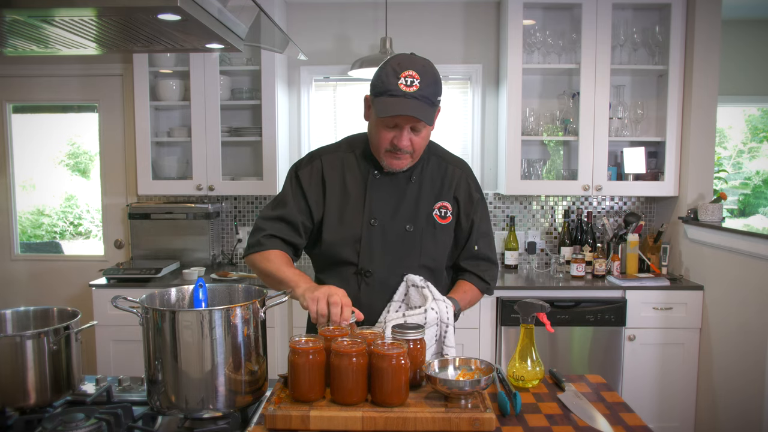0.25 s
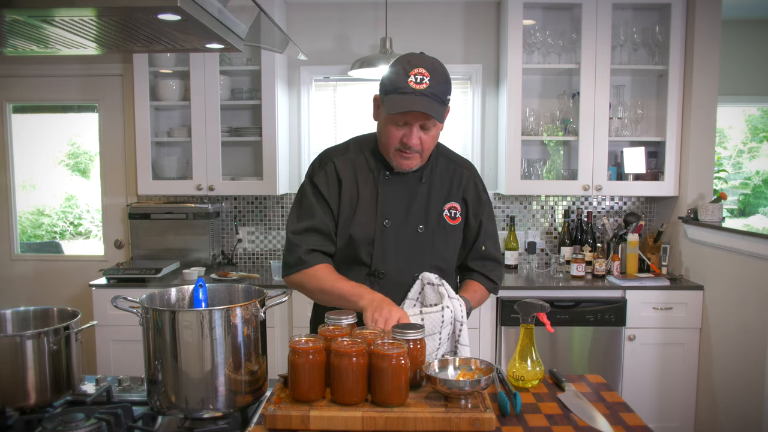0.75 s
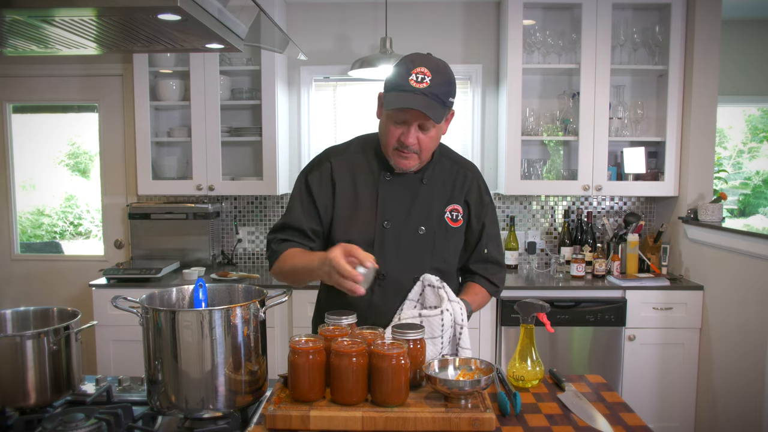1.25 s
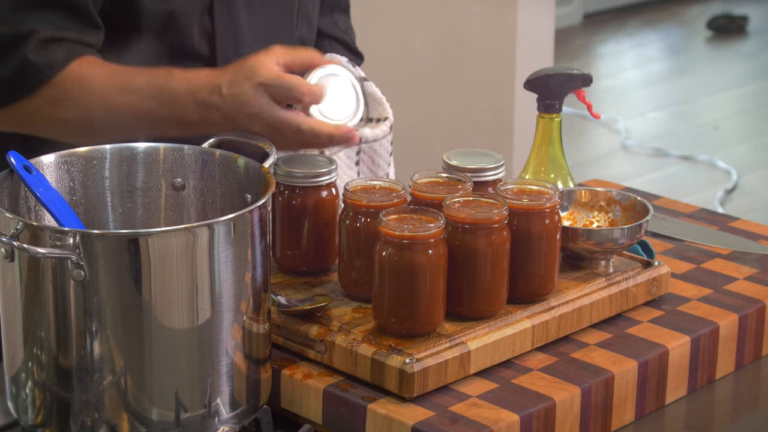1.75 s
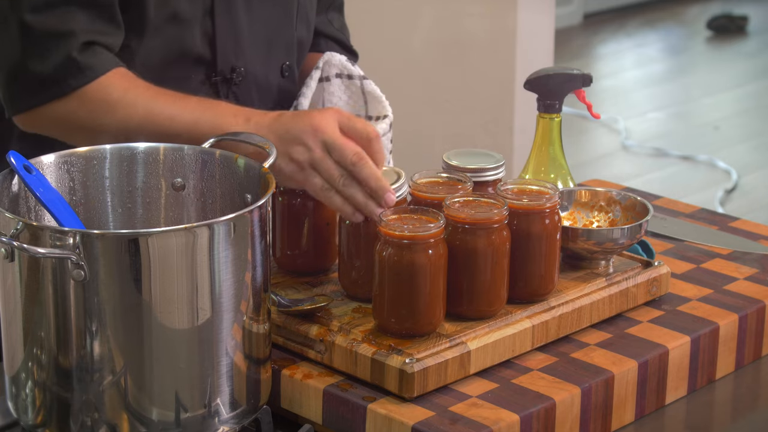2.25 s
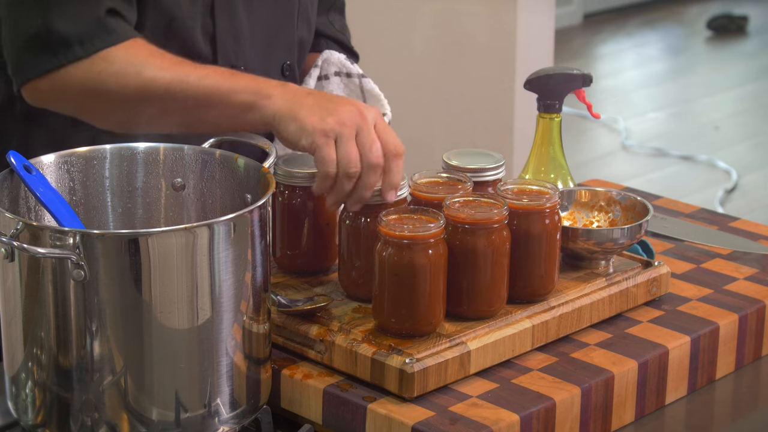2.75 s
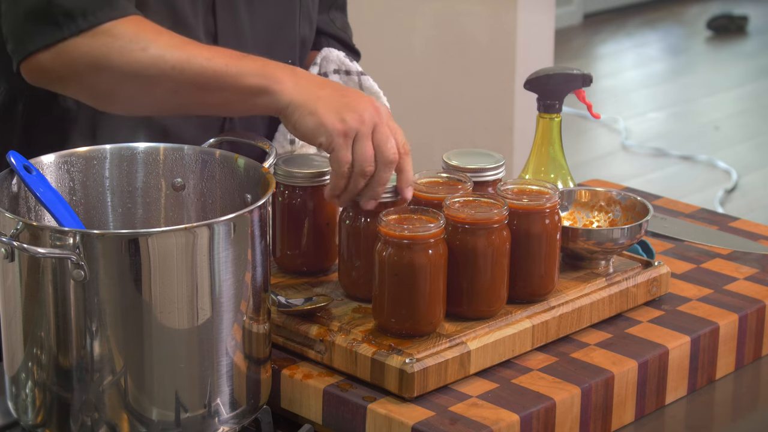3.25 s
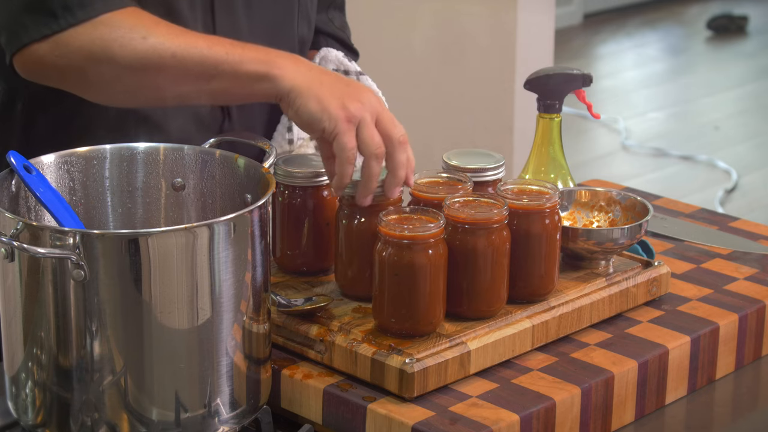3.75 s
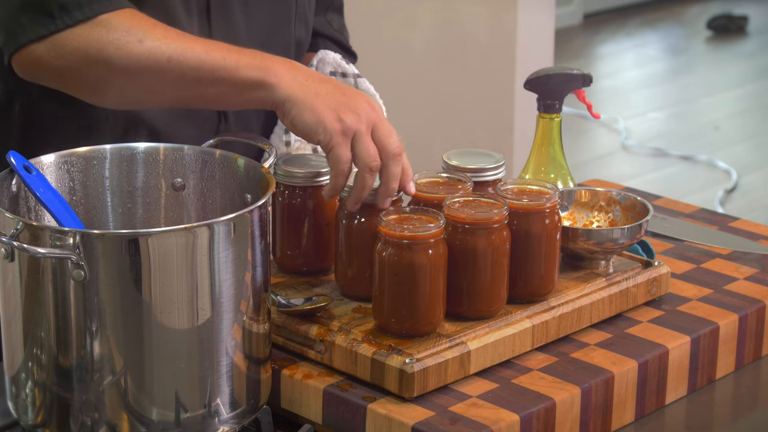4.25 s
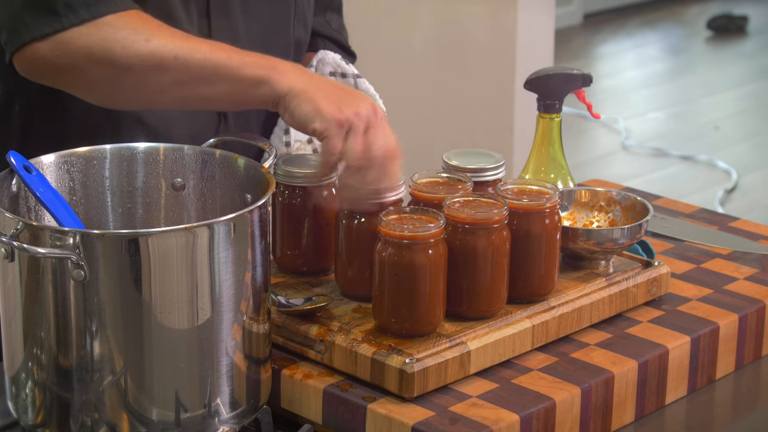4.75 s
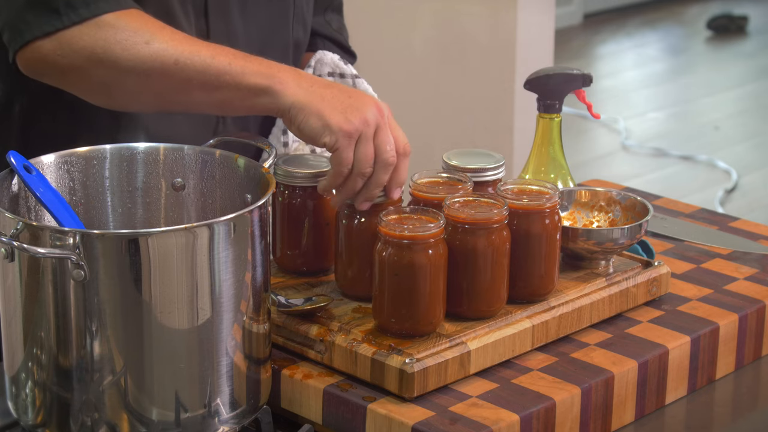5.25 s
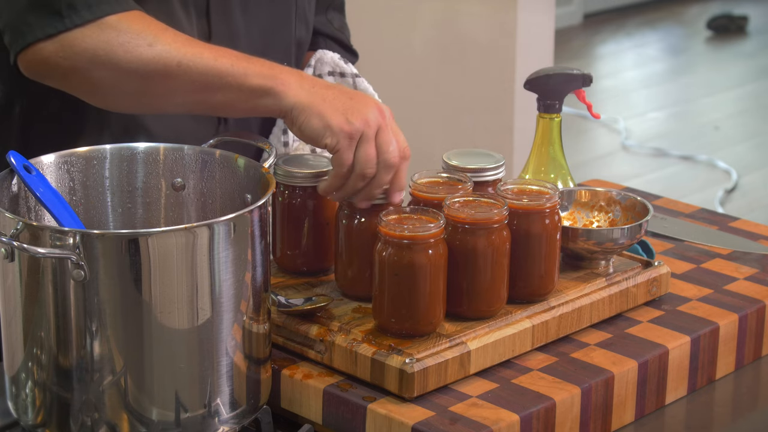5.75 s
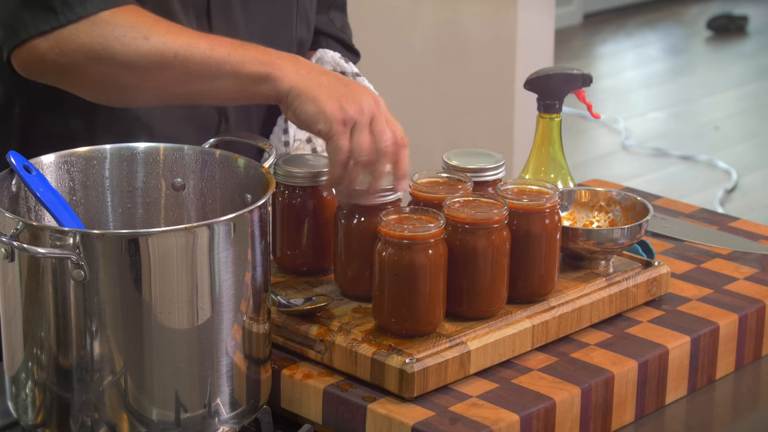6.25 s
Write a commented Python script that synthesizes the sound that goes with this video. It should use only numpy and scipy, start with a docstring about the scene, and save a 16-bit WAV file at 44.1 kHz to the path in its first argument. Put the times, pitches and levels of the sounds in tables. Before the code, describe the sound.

In a quiet hard-walled kitchen, heard from a microphone worn on the chest, tiny cloth ticks precede a loud, woody knock at 0.24 s as a full jar lands on a board. It rocks, with weaker taps, another strong knock at 0.4 and a faint one with a trace of glass at 0.55. Fabric swishes to about 0.9, with a dull bump near 0.7 and one faint clink at 0.87. Cloth brushes softly until a low bump at 1.57. From 2.08 to 2.35 a metal lid clinks and scrapes brightly on glass, with firmer clicks at 2.55-2.6. Sparse light ticks and soft gritty rubs follow from 3 to 5.9 as it twists, with a low microphone bump at 4.1. Scrapes gather at 6.1-6.22, then a duller, damped wooden thud lands at 6.25. Short room reverberation and faint air remain throughout.

```python
"""A jar is knocked down on a wooden board: soft pushes ring the board's modes under a dull crack and faint glass.
A metal lid is then laid on a glass jar and twisted on: bursts of slips ring its modes as clinks and scrapes.
Clothing rubs and bumps a chest-worn microphone: shaped noise, tiny ticks and short sine bursts.
The hard-walled kitchen adds single echoes and a sparse decaying tail; steady filtered noise is the room air."""
import sys
import numpy as np
from scipy import signal
from scipy.io import wavfile
from scipy.ndimage import uniform_filter1d

SR = 44100
rng = np.random.default_rng(int(sys.argv[2]) if len(sys.argv) > 2 else 0)


def nominal_scale(level):
    """Amplitude ratio for a level in decibels (scalar or array-like)."""
    x = np.asarray(level, float) / 20
    return 10 ** x


def store_pcm(level_fs):
    """Save levels as 16-bit WAV."""
    pcm = np.round(np.clip(level_fs, -1, 1) * 32767).astype(np.int16)
    wavfile.write(sys.argv[1], SR, np.atleast_2d(pcm).T)


N = 285768  # length in samples


def evened(x):
    """Scales to rms 1."""
    return x / np.sqrt(np.mean(x ** 2) + 1e-20)


def read(points, hz):
    """Reads a spectrum on a log-frequency axis."""
    f, value = np.transpose(points)
    return np.interp(np.log(hz + 1), np.log(f + 1), value)


def add(mix, s, sound):
    """Adds a sound at time s in seconds."""
    part = mix[round(s * SR):][:len(sound)]
    part += sound[:len(part)]


def favour_db(hz, centre_hz, lift_db, octaves):
    """The place of contact lifts the modes near one frequency."""
    distance = np.log2(hz / centre_hz) / octaves
    return lift_db * np.exp(-.5 * distance ** 2)


def ring(hz, db, t60, seconds):
    """A sum of dying modes set off by one blow."""
    t = np.arange(round(seconds * SR)) / SR
    sign = rng.choice([-1, 1], (len(hz), 1))  # neighbouring modes start in either direction
    decay = nominal_scale(db[:, None] - 60 * t / t60[:, None])
    return (sign * decay * np.sin(2 * np.pi * hz[:, None] * t)).sum(0)


def noise(spectrum, patchy_db, size):
    """Random short-time spectra with drifting patches, at rms 1."""
    hz = np.fft.rfftfreq(size, 1 / SR)
    real, imag, patches = rng.standard_normal((4 * N // size + 5, len(hz), 3)).T
    patches = uniform_filter1d(patches, len(hz) // 16, 0)  # smooth across frequency
    patches = evened(uniform_filter1d(patches, 6, 1))  # and over time
    frames = (real + 1j * imag) * nominal_scale(read(spectrum, hz)[:, None] + patchy_db * patches)
    return evened(signal.istft(frames, nperseg=size, noverlap=3 * size // 4)[1][:N])


# Modes of the wooden board when no hand presses on it: [f/Hz, relative level/dB, t60/s]
BOARD_MODES = [(82, -8.5, 0.061), (154.6, -3, 0.095), (235.6, -6.5, 0.092), (258, -7.5, 0.16),
               (297.3, 4, 0.094), (392.6, -11, 0.22), (460, 10, 0.036), (503, -10.5, 0.17),
               (595, -6, 0.096), (644.6, -9, 0.13), (814.6, 14.5, 0.023), (790, 4.5, 0.05),
               (885, 11, 0.027), (1056, -14, 0.11), (1074, -1, 0.074), (1193, 15.5, 0.02),
               (1361, 2.5, 0.025), (1577, -3, 0.053)]


def board_thud(centre_hz, lift_db, free):
    """A soft push rings the board's modes; free is the share of ring time left; peak 1."""
    hz, db, t60 = np.transpose(BOARD_MODES)
    place_db = db + favour_db(hz, centre_hz, lift_db, 0.25)
    # glued blocks and counter add two shorter neighbours to each mode
    near_hz = (hz * (1 + .07 * rng.standard_normal((2, len(hz))))).ravel()
    wood = ring(hz, place_db, free * t60, .4)
    wood += ring(near_hz, np.tile(place_db - 5, 2), np.tile(.5 * free * t60, 2), .4)
    thud = signal.fftconvolve(wood, np.hanning(20))  # soft push
    roll = round(300 * (1 + (lift_db / 28) ** 4))  # the base rolls down; slowly where it rings one part only
    thud[:roll] *= np.linspace(.08, 1, roll) ** 3.15
    return thud / abs(thud).max()


def dull_cracks(count):
    """The cracks of the landings: noise in a dull mid band, each dying by 60 dB in 0.096 s."""
    slope = signal.butter(1, [1100, 2200], "band", fs=SR, output="sos")
    dull = np.vstack([slope, signal.butter(2, 3000, fs=SR, output="sos")])
    cracks = signal.sosfilt(dull, rng.standard_normal((count, 4000)))
    decay = nominal_scale(-60 * np.arange(4000) / SR / 0.096)
    return [decay * evened(crack) for crack in cracks]


# Landings of jar on board: [t/s, thud peak level/dB, favoured f/Hz, its lift/dB, glass level re thud/dB]
LANDINGS = [(.235, -2.5, 835, 7, -69), (.278, -19.5, 278.5, 1, -77.5), (0.308, -24.5, 790, 28, -67),
            (.396, -6.5, 590, 5.5, -48), (0.438, -27, 286, 12, -58), (.548, -34.5, 810, 31, -38),
            (6.246, -19, 700, 15, -64), (6.252, -19, 482, 13.5, -73), (6.259, -25.5, 567, 10, -73),
            (6.288, -34, 257, 11, -77), (6.334, -35, 600, 9.5, -71)]
# Modes of the full glass jar: [f/Hz, relative level/dB, t60/s]
JAR_MODES = [(3310, 4, .15), (6460, 0, .3), (8000, -2, .12)]
CRACK_DB, CRACK_PER_LIFT = -12, -1.37  # a landing that rings one part of the board cracks less
HELD_FROM_S, HELD_RING = 6.0, .5  # a hand then presses the jar down; share of board ring time left


def knocks():
    """The jar lands, rocks and lands again: board thud, dull crack and a faintly singing glass."""
    out = np.zeros(N)
    cracks = dull_cracks(len(LANDINGS))
    for (s, peak_db, centre_hz, lift_db, glass_db), crack in zip(LANDINGS, cracks):
        free = HELD_RING if s > HELD_FROM_S else 1
        crack_db = CRACK_DB + CRACK_PER_LIFT * lift_db
        add(out, s - .003, nominal_scale(peak_db) * board_thud(centre_hz, lift_db, free))
        add(out, s - .001, nominal_scale(peak_db + crack_db) * crack)
        add(out, s, nominal_scale(peak_db + glass_db) * ring(*np.transpose(JAR_MODES), .4))
    return out


# Quick touches of lid on glass: [t/s, relative level/dB, favoured low f/Hz, favoured high f/Hz, treble level/dB]
CLINK_TOUCHES = [(0.868, -39, 1750, 2880, 3.5), (2.11, -44.5, 1200, 12300, -1), (2.14, -32, 1020, 5900, 13),
                 (2.158, -28, 1910, 3600, -4), (2.175, -36, 1940, 3770, 0), (2.311, -35, 1026, 5860, -6.5),
                 (2.545, -28.5, 1150, 3700, -8.5), (2.602, -22.5, 640, 3900, -3),
                 (2.603, -32, 1550, 4470, 9), (2.93, -43.5, 990, 3700, -10.5), (2.993, -41, 590, 3240, -5),
                 (3.005, -34, 590, 3600, -12.5), (3.43, -52, 1720, 5730, 3),
                 (3.489, -30.5, 835, 3100, -11.5), (3.609, -36.5, 737, 4140, -13.5),
                 (3.762, -41, 1210, 6940, 15.5), (3.975, -38.5, 1660, 3680, -7.5),
                 (4.076, -39.5, 1150, 4920, 2), (4.222, -45.5, 2040, 4830, 2), (4.567, -42, 1880, 5350, 6),
                 (4.858, -38, 1940, 3600, -8.5), (4.944, -39, 2940, 4850, 5),
                 (4.956, -35.5, 1150, 4700, -2), (5.058, -32, 1240, 5300, -1),
                 (5.262, -43.5, 1055, 3700, -4), (5.411, -30.5, 965, 3640, -6),
                 (5.465, -42.5, 1700, 4740, 6), (5.781, -34.5, 870, 3480, -8),
                 (5.844, -38.5, 1864, 3380, -4)]
CLINK_MS = 3.17  # rub time of a quick touch
# Lid sliding on rim and thread:
# [t/s, relative level/dB, favoured low f/Hz, favoured high f/Hz, treble level/dB, rub time/ms]
SCRAPE_RUBS = [(2.082, -41, 1830, 12300, 4, 30), (2.099, -27.5, 1920, 4330, 7.5, 11),
               (2.122, -31, 1830, 12300, 3, 12.3), (2.147, -30.5, 1710, 3700, -5, 4.6),
               (2.185, -36.5, 1876, 3750, -3, 53), (2.284, -34, 1590, 3940, -10, 4.9),
               (2.334, -40, 1150, 4700, -5, 12), (2.422, -46, 1940, 3650, 7, 27),
               (2.532, -31, 660, 2820, -24, 11.5), (2.618, -32.5, 595, 3600, -15, 3),
               (3.039, -47, 700, 3600, -26, 86), (3.459, -44, 593, 4230, -37.5, 30),
               (3.503, -33, 1660, 3100, -18, 3.9), (3.53, -46, 1630, 3000, -22, 19),
               (3.884, -34.5, 1586, 4570, -5, 27), (3.93, -42, 1400, 4680, 12, 25),
               (4.088, -43.5, 1150, 3220, 1.5, 20.4), (4.33, -45.5, 593, 4230, -1.5, 16),
               (4.534, -43.5, 593, 4560, -5, 27), (4.927, -47.5, 1400, 4000, 11, 19),
               (4.975, -37, 707, 4100, -0.5, 7.9), (5.047, -53, 5400, 5400, -17, 4),
               (5.066, -43.5, 615, 5350, -5, 44), (5.584, -45.5, 2080, 5300, -4, 9.9),
               (5.63, -44.5, 670, 1950, -12, 60), (5.688, -52, 1960, 3450, 1.5, 14),
               (5.75, -43.5, 550, 1940, -30, 27), (5.765, -32.5, 784, 2020, -39, 4),
               (5.796, -35, 635, 4260, -29, 26), (6.099, -46, 2000, 4600, -2, 8.3),
               (6.122, -32.5, 566, 1800, -24, 9), (6.17, -38, 544, 2060, 1, 18),
               (6.198, -37.5, 2100, 7200, -2.5, 16), (6.216, -29.5, 600, 1150, -27, 9.4)]
TWIST_S, STRAY_DB = (3.9, 4.8), -57  # stray touches fall at random in this span; their lowest relative level


def contacts(count=10):
    """All touches in the columns of the scrapes: clinks, scrapes and faint stray ticks as the hand twists."""
    rows = [(*row, CLINK_MS) for row in CLINK_TOUCHES]
    rows += SCRAPE_RUBS
    start, end = TWIST_S
    for a, b, c, d, e in rng.random((count, 5)):
        s, level_db = start + a * (end - start), STRAY_DB + 6 * b
        rows.append((s, level_db, 600 * 3.25 ** c, 3000 * 2 ** d, -12 * e, CLINK_MS))
    return rows


def slips(draws, rub_ms, slide):
    """Uneven slips of metal on glass: sparse impulses of random size and sign under a rub that fades."""
    when, size, side = draws.T
    impulses = (when < 5000 / SR) * nominal_scale(-4.0 * np.log(size + 0.053)) * np.sign(side - .5)
    u = np.arange(12000) / SR * 1000 / max(rub_ms, .3)  # time in rub lengths
    drive = impulses * (1 - np.exp(-u / 0.42)) * np.exp(-u)
    drive[0] = 2.14 * (1 - slide)  # a quick contact opens with one hard touch
    return drive


# Modes of lid and jar mouth before the grip damps them: [f/Hz, relative level/dB, t60/s]
LID_MODES = [(430, 7.5, 0.033), (553, -9.5, 0.022), (590, 1.5, 0.067), (700, -1.5, 0.0032),
             (870, -17, 0.28), (990, -8.5, 0.054), (1150, -7, 0.046), (1400, -7, 0.1), (1660, -12, 0.078),
             (1800, -6.5, 0.069), (1924, -8, 0.069), (2060, -9.5, 0.15), (2770, -3.5, 0.05),
             (2970, -5, 0.039), (3600, -1, 0.028), (3900, -22, 0.075), (4440, 0, 0.0077),
             (4730, -2.5, 0.018), (5374, -2.5, 0.033), (5620, -1, 0.01), (6240, -15, 0.0097),
             (7720, -3.5, 0.017), (8450, -9, 0.012), (12300, -4, 0.014), (14400, -6, .008)]


def lid_body(chance, low_hz, high_hz, treble_db, slide):
    """What one slip rings: lid modes near the contact, a crowd of short neighbours and a bare tick."""
    hz, base_db, t60 = np.transpose(LID_MODES)
    own_detune, own_db, crowd = chance[0], chance[1], chance[2:]
    high = 1 / (1 + (2400 / hz) ** 12)
    low_lift = favour_db(hz, low_hz, 22, .15 + .04 * slide)
    high_lift = favour_db(hz, high_hz, 13, .085 + .05 * slide)
    db = base_db + low_lift + high_lift + high * treble_db
    grip = .7 - .3 * slide  # rubbing fingers and thread damp the ring
    body = ring(hz * (1 + 0.0049 * own_detune), db + 1.5 * own_db, t60 * grip, .2)
    # dents and glass add short modes around each one
    crowd_hz = (hz * (1 + (.028 + .017 * slide) * crowd)).ravel()
    body += ring(np.minimum(crowd_hz, 16000), np.tile(db - 2.0, 4), np.tile(0.56 * grip * t60, 4), .2)
    body[:3] += nominal_scale(treble_db + 3) * np.array([1, 0, -1])  # bare tick of the slip
    return body


def lid():
    """Each contact is a burst of slips that rings the lid: short = clink, long = scrape."""
    out = np.zeros(N)
    touches = contacts()
    chances = rng.standard_normal((len(touches), 6, len(LID_MODES)))
    slip_draws = rng.random((len(touches), 12000, 3))
    for touch, chance, draws in zip(touches, chances, slip_draws):
        s, level_db, low_hz, high_hz, treble_db, rub_ms = touch
        slide = rub_ms ** 2 / (rub_ms ** 2 + 6 ** 2)  # 0 touch, 1 long rub: wanders over more modes
        body = lid_body(chance, low_hz, high_hz, treble_db, slide)
        sound = signal.fftconvolve(slips(draws, rub_ms, slide), body)
        loudest = np.sqrt(uniform_filter1d(sound ** 2, 300).max())  # loudest short-time rms
        add(out, s, nominal_scale(level_db - 6.0) * sound / loudest)
    return signal.sosfilt(signal.butter(3, 420, "high", fs=SR, output="sos"), out)  # too small to radiate bass


# Fabric swishes: [end t/s, hiss peak level/dB, swell time/s]
FABRIC_SWISHES = [(0.579, -50, 0.62), (0.726, -45, 0.16), (0.885, -56, 0.13), (1.279, -63, 0.17),
                  (1.45, -66.5, 0.11), (1.585, -54.5, 0.074), (2.552, -80.5, 0.53)]


def swishes(t):
    """Level of fabric strokes that swell in a straight line and stop short."""
    level = np.zeros(N)
    for end, peak_db, swell in FABRIC_SWISHES:
        rise = np.clip(1 + (t - end) / swell, 0, 1)
        stop = np.exp(-np.maximum(t - end, 0) / 0.0058)  # time constant in s
        level += nominal_scale(peak_db) * rise * stop
    return level


# Bumps on the microphone: [t/s, peak level/dB, f/Hz, length/cycles]
MIC_BUMPS = [(0.683, -28.5, 370, 4.4), (0.726, -33, 132, 1.4), (1.57, -27.5, 177, 1.63),
             (1.794, -42, 154, 2.2), (1.817, -42, 163, 3.4), (4.105, -28, 205, 0.8), (4.287, -44, 197, 1.2),
             (4.737, -51.5, 297, 3.2), (4.818, -38, 177, 2.4), (6.261, -52, 75, 3)]


def bumps():
    """The microphone is bumped: short sine bursts that rise fast and fade."""
    out = np.zeros(N)
    for s, peak_db, hz, cycles in MIC_BUMPS:
        u = np.arange(0, 3.4 * cycles, hz / SR)  # time in cycles
        swell = u / cycles * 4 * np.exp(1 - 4 * u / cycles)  # peaks at 1
        add(out, s, nominal_scale(peak_db) * np.sin(2 * np.pi * u) * swell)
    return out


# Clothing as the body sways, before swishes: [t/s, rumble level/dB, hiss level/dB]
BODY_SWAY = [(0.0, -60.5, -66), (0.27, -74, -82), (0.4, -33.5, -57), (0.58, -49.5, -63),
             (0.878, -52.5, -59.5), (0.99, -57, -63), (1.19, -56, -66), (1.679, -52.5, -63),
             (1.95, -66.5, -77), (2.35, -57.5, -59), (2.6, -56, -58), (3.3, -63.5, -88), (3.54, -54.5, -67),
             (3.9, -61.5, -64.5), (4.2, -54.5, -62), (4.6, -68, -99.5), (5.0, -57, -60.5),
             (5.41, -62.5, -72), (6.079, -64.5, -77.5), (6.48, -56.5, -66.5)]
# Spectrum of the fabric hiss: [f/Hz, relative level/dB per Hz]
FABRIC_HISS = [(240, -33.5), (400, 2.5), (708, -34.5), (879, -8.5), (1460, -10.5), (2880, -17.5),
               (10400, -28.5), (14600, -26.5), (16000, -35.5)]
# Spectrum of the fabric rumble: [f/Hz, relative level/dB per Hz]
FABRIC_RUMBLE = [(15, -87.5), (25, -31.5), (80, -0.5), (209, 1.5), (726, -9), (1090, -22.5), (1200, -28.5),
                 (1560, -65), (2640, -120)]
# Threads catching: [t/s, approximate starting level/dB]
THREAD_TICKS = [(.09, -62), (.197, -52), (.203, -60)]


def clothing():
    """Fabric slides over the capsule: grainy hiss, lumpy rumble, tiny ticks and a few dull bumps."""
    t = np.arange(N) / SR
    at, rumble_db, hiss_db = np.transpose(BODY_SWAY)
    grain_db = 1.3 * evened(uniform_filter1d(rng.standard_normal(N), 150))
    swish = swishes(t)
    hiss_level = (nominal_scale(np.interp(t, at, hiss_db)) + swish) * nominal_scale(grain_db)
    rumble_level = nominal_scale(np.interp(t, at, rumble_db)) + nominal_scale(6.0) * swish
    out = hiss_level * noise(FABRIC_HISS, 0.84, size=256)
    out += rumble_level * noise(FABRIC_RUMBLE, 1.0, size=2048)
    for s, level_db in THREAD_TICKS:
        tick = np.diff(rng.standard_normal(121)) / 3
        add(out, s, nominal_scale(level_db - .3 * np.arange(120)) * tick)
    return out + bumps()


# Decay of the kitchen's tail: [f/Hz, t60/s]
WALL_DECAY = [(100, 0.31), (300, 0.36), (1000, 0.49), (3000, 0.47), (8000, 0.35), (15000, 0.19)]
# Early single echoes: [t/s, level/dB]
EARLY_ECHOES = [(.009, -21), (0.016, -13.5), (0.02, -18)]


def kitchen(x):
    """Hard walls: a few single echoes, then sparse taps of random sign dying band by band."""
    taps, starts = np.zeros(SR), np.arange(300, SR - 20, 20)
    taps[starts + rng.integers(0, 20, len(starts))] = rng.choice([-1., 1.], len(starts))
    hz, t, bands = signal.stft(taps, SR, nperseg=256)
    t60 = np.maximum(read(WALL_DECAY, hz), .05)[:, None]
    tail = signal.istft(bands * nominal_scale(-60 * t / t60), SR, nperseg=256)[1]
    tail = nominal_scale(-6.5) * tail / np.linalg.norm(tail)
    for s, db in EARLY_ECHOES:
        add(tail, s, nominal_scale(db) * np.hanning(9) / 4)
    return signal.fftconvolve(x, tail)[:N]


# Spectrum of the room air: [f/Hz, relative level/dB per Hz]
AIR_SPECTRUM = [(24, -46.5), (40, -29), (329, -2), (392, -15.5), (433, -1), (751, -22), (1090, -19),
                (2910, -28.5), (4240, -27.5), (5440, -29.5), (16000, -39.5)]


def room_air():
    """Steady, slightly patchy noise at an rms of -64.5 dB."""
    return nominal_scale(-64.5) * noise(AIR_SPECTRUM, 1.5, size=1024)


def scene():
    """Board and lid sound through the room; clothing and room air reach the capsule directly."""
    board, metal = knocks(), lid()
    # the lid points up at the microphone, so it sends less into the room
    struck = board + metal + kitchen(board + nominal_scale(-4.0) * metal)
    air = room_air()
    return (struck + clothing() + air)[None]


def roll_off(x):
    """The treble ends steeply here."""
    return signal.sosfilt(signal.butter(12, 16310, fs=SR, output="sos"), x)


def record(dry):
    """The microphone cuts the bass below 60 Hz; a steep filter ends the band at 15850 Hz."""
    thin = signal.sosfilt(signal.butter(3, 60, "high", fs=SR, output="sos"), dry)
    band_limit = signal.firwin(511, 15850, window=("kaiser", 9), fs=SR)
    limited = signal.oaconvolve(thin, band_limit[None], "same")
    return roll_off(limited)


dry = scene()
out = record(dry)
store_pcm(out)
```